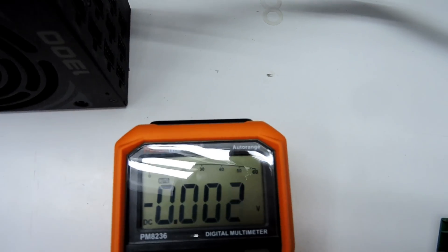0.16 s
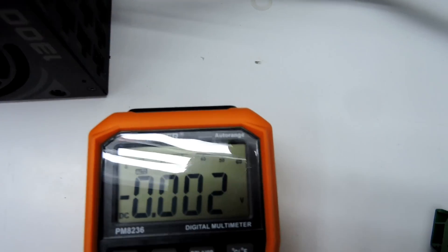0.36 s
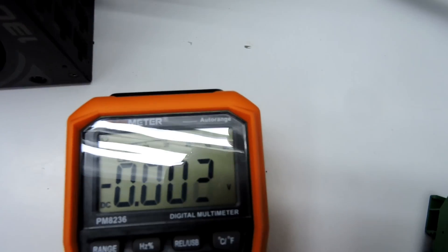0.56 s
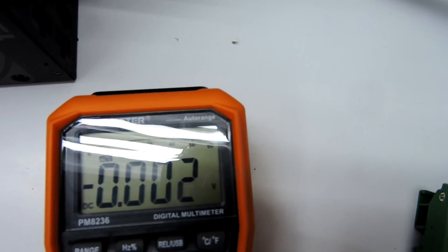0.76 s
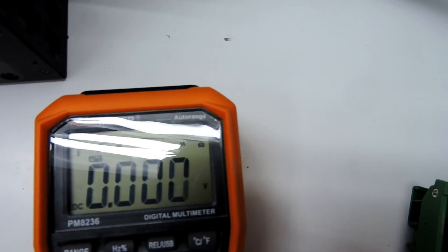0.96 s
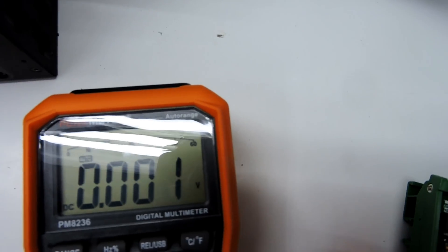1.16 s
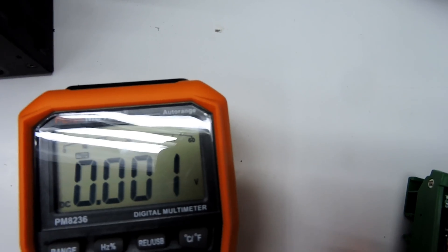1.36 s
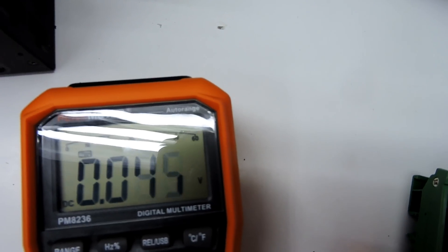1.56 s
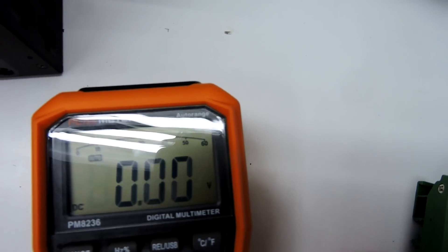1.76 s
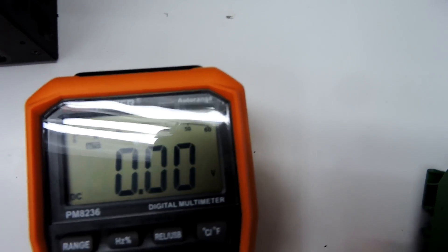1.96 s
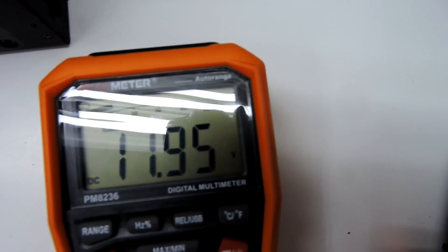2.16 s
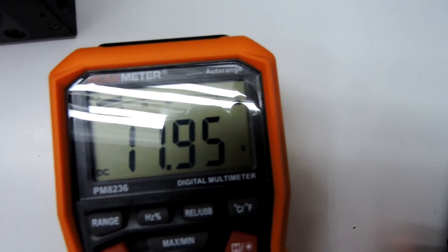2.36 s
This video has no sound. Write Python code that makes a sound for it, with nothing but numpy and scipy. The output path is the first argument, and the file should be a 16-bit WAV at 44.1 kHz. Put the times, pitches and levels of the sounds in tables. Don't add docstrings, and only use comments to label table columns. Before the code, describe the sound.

Continuous fan noise, low wavering motor hum with rushing air and thin high sizzle, close and quiet in stereo at a workbench; soft knocks on the camera body and two small probe ticks interrupt briefly.

```python
import sys
import numpy as np
from scipy import signal
from scipy.io import wavfile
from scipy.ndimage import uniform_filter1d, map_coordinates

SR = 44100
rng = np.random.default_rng(int(sys.argv[2]) if len(sys.argv) > 2 else 0)


def gain_from_db(level_db):
    decades = np.asarray(level_db, float) / 20
    return 10 ** decades


def waveform_to_disk(signal):
    frames = np.transpose(np.atleast_2d(signal))
    scaled = np.clip(frames, -1, 1) * 32767
    samples = np.round(scaled).astype(np.int16)
    wavfile.write(sys.argv[1], SR, samples)


N = 110161
AIR_DB = -46.5


def level(x, db):
    return x * gain_from_db(db) / np.sqrt(np.mean(x ** 2))


def read(table, hz):
    table = np.array(table)
    return np.interp(np.log(hz), np.log(table[:, 0]), table[:, 1])


def band(x, hz, width_hz):
    edges = [hz - width_hz / 2, min(hz + width_hz / 2, 0.49 * SR)]
    return signal.sosfilt(signal.butter(2, edges, "band", fs=SR, output="sos"), x)


def walk(rate_hz):
    hold = int(SR / rate_hz)
    steps = np.repeat(rng.standard_normal(N // 400), hold)[:N + hold]
    slewed = uniform_filter1d(uniform_filter1d(steps, hold), hold)
    return 1.3 * slewed[:N]


def pan(left_minus_right_db):
    return gain_from_db(np.array([[left_minus_right_db], [-left_minus_right_db]]) / 2)


def partly_alike(a, b, likeness):
    return np.array([a, likeness * a + np.sqrt(1 - likeness ** 2) * b])


def delayed(x, lag_s):
    return map_coordinates(x, [np.arange(N) - lag_s * SR], mode="mirror")


def rush(spectrum, db, swell_db, flicker_db, rate_hz, focus=1):
    # pitch_hz, likeness (0-1)
    alike = [(60, 0.87), (130, 1), (290, 0.94), (640, 0.74), (1410, 1), (3100, 0), (6800, 0.44),
             (15000, .02)]
    # pitch_hz, left_minus_right_db
    lean = [(60, 6.5), (200, 1), (380, 2), (700, 8), (1290, 7), (2380, -0.8), (4400, 0.9), (15000, 2.7)]
    out = 0
    swell = walk(rate_hz / 2)
    lowest_hz, highest_hz = spectrum[0][0], spectrum[-1][0]
    for hz in lowest_hz * 2 ** np.arange(0, np.log2(highest_hz / lowest_hz), 1 / 3):
        a, b = band(rng.standard_normal((2, N)), hz, hz / 4)
        likeness = np.clip(read(alike, hz), 0, 1) ** focus
        gain = gain_from_db(read(spectrum, hz) + swell_db * swell + flicker_db * walk(rate_hz))
        out = out + gain * pan(read(lean, hz)) * partly_alike(a, b, likeness)
    return level(out, db)


def tone(hz, db, wander):
    turns = rng.random() + np.cumsum(hz * (1 + wander * walk(3.02))) / SR
    return np.sqrt(2) * gain_from_db(db) * np.sin(2 * np.pi * turns)


def motors(fan_db, buzz_db):
    # pitch_hz, level_db, waver_db
    hums = [(41.6, -39.5, 2.5), (51.1, -44.5, -8), (76, -45.5, -3), (99.9, -61.5, -8), (144.7, -51, -4),
            (170, -53, 3), (178, -54, 3), (237, -56, 3.5), (28.5, -59, -13)]
    out = tone(60.6, fan_db + 0.7, 0.0053) + tone(118.6, buzz_db - 0.4, 0.0046)
    for hz, db, waver_db in hums:
        out = out + tone(hz, db + waver_db * walk(5.26), 0.00602)
    return pan(1.6) * out


def rumble():
    # pitch_hz, level_db (per Hz)
    rumble_spectrum = [(20, -10), (32, -13.5), (50, -1.5), (80, -3), (130, -4), (250, -8.5), (330, -16.5),
                       (600, -34)]
    return rush(rumble_spectrum, -39.5, 0.29, 1.55, 5.83)


def stream():
    # pitch_hz, level_db (per Hz)
    air_spectrum = [(200, -1), (400, -1.5), (720, -5), (950, -8.5), (1500, -7), (2500, -12.5),
                    (4500, -21.5), (8000, -25)]
    return rush(air_spectrum, AIR_DB, 0.8, 1.1, 11.75)


def case():
    # pitch_hz, width_hz, level_db (against the stream)
    resonances = [(509, 49, -15), (723.6, 75, -13), (904, 34, -19.5), (1160, 45, -19), (1737, 75, -26.5)]
    out = 0
    for hz, width_hz, db in resonances:
        blown = band(rng.standard_normal(N), hz, width_hz)
        out = out + level(blown, AIR_DB + db + 3.5 * walk(4.68))
    return pan(3.7) * out


def draught(near_db):
    # pitch_hz, level_db (per Hz)
    draught_spectrum = [(350, -11.5), (700, -2.5), (1200, -8.5), (2200, -11), (4500, -20.5), (7000, -25)]
    steady_db, lead_s = -49, 0.00022
    gain = np.sqrt(np.clip(gain_from_db(near_db) ** 2 - gain_from_db(steady_db) ** 2, 0, None))
    left, right = gain * rush(draught_spectrum, 1.5, 0.57, 0.95, 11.97, focus=0.43)
    return np.array([delayed(left, lead_s), right])


def hiss(near_db):
    # pitch_hz, level_db (per Hz)
    hiss_spectrum = [(2500, -2), (5000, -7.5), (8000, -5.5), (10500, -5), (13000, -3.5), (14500, -7),
                     (16000, -10)]
    nearness = gain_from_db(0.29 * (near_db - near_db.mean()))
    return nearness * rush(hiss_spectrum, -56, 0.35, 0.6, 56)


def bearing(t):
    # pitch_hz, width_hz, level_db (loudest), left_minus_right_db
    sizzle = [(9070, 720, -63.5, 12), (8240, 260, -69.5, 15), (12100, 400, -66, -17),
              (11200, 1700, -67, 19), (13430, 300, -62, 4), (11740, 300, -67, 1), (12600, 380, -67, 6),
              (9550, 390, -68, 14), (12900, 200, -71, 2.5)]
    # facing_s, early_db (fall one second before), late_db (one second after)
    facing = [(2.22, 1.5, -1), (2.2, 23, 0), (0.34, 14, 50), (.1, 8, 40), (0.89, 30, 60), (1.5, 5, -5),
              (.42, 113, 150), (2.4, 16, 3), (.9, 32, 8)]
    grit_per_s, grit_spread_db, grit_shared = 5000, 3, 0.75
    throb_hz, throb_depth = 100, 0.25
    out = 0
    for (hz, width_hz, db, lean_db), (at, early_db, late_db) in zip(sizzle, facing):
        chance, side = rng.random((2, 2, N))
        size = gain_from_db(grit_spread_db * np.minimum(rng.exponential(size=(2, N)), 4))
        grit = (chance < grit_per_s / SR) * np.sign(side - 0.5) * size
        a, b = band(grit, hz, width_hz)
        turns = np.cumsum(throb_hz * (1 + 0.18 * walk(3.3))) / SR
        throb = 1 + throb_depth * np.sin(2 * np.pi * turns)
        aim_db = -np.where(t < at, early_db, late_db) * (t - at) ** 2 + 0.5 * walk(25.12)
        ringing = level(partly_alike(a, b, grit_shared), db)
        out = out + ringing * throb * gain_from_db(aim_db) * pan(lean_db)
    return out


def coils():
    # pitch_hz, level_db
    whines = [(7422, -80.5), (8091, -94), (12144, -73)]
    return pan(4.4) * sum(tone(hz, db + 5 * walk(4.25), 0.0022) for hz, db in whines)


def ring(t, at, modes, push_s):
    age = np.clip(t - at, 0, None)
    rise = np.clip(age / push_s, 0, 1)
    fall = np.clip(age - push_s, 0, None)
    return rise * sum(gain_from_db(db - 60 * fall / t60) * np.sin(2 * np.pi * hz * age) for hz, db, t60 in modes)


def knocks(t):
    # start_s, level_db, low_ring_hz, high_ring_hz, high_ring_db
    hand_knocks = [
        (0.2083, -32.5, 420, 850, -3),
        (0.7347, -32, 413, 620, 2.5),
        (1.965, -41.5, 440, 910, 3.5),
    ]
    t60_s = 0.026
    out = 0
    for at, db, low_hz, high_hz, high_db in hand_knocks:
        noise = band(band(rng.standard_normal(N), 810, 670), 750, 840)
        thud = level(noise, -7) * (t > at) * gain_from_db(-60 * np.abs(t - at) / t60_s)
        modes = [(low_hz, -0.5, t60_s * 1.7), (high_hz, high_db, t60_s)]
        out = out + gain_from_db(db) * pan(5.5) * (thud + ring(t, at, modes, 0.00084))
    return out


def ticks(t):
    # start_s, level_db, left_minus_right_db, probe_ring_hz, thump_db
    probe_ticks = [
        (0.308, -46.5, 8.5, 7400, 4),
        (1.3009, -42, -6, 9100, 5.5),
    ]
    # pitch_hz, level_db, t60_s
    tick_modes = [(11450, -2, .012), (11530, 4, 0.015), (12100, -3, .016), (6700, -18, 0.015)]
    scrape_s = 0.0073
    out = 0
    for at, db, lean_db, probe_hz, thump_db in probe_ticks:
        burst = (t > at) * np.exp(-((t - at - scrape_s / 3) / scrape_s * 2) ** 2)
        scrape = band(rng.standard_normal((2, N)), 9500, 7500) * burst
        modes = [*tick_modes, (probe_hz, -2.5, 0.014), (1220, thump_db, 0.015)]
        out = out + gain_from_db(db) * pan(lean_db) * (ring(t, at, modes, 0.0011) + gain_from_db(-1) * scrape)
    return out


def scene():
    # (motor buzz near 118.6 Hz, likewise)
    level_course = [(0.0, -48, -37, -41.5), (0.09, -47.5, -32, -56), (0.26, -48, -72, -42.5),
                    (0.37, -47.5, -34.5, -82), (0.57, -47, -38, -52), (0.65, -46.5, -34.5, -39),
                    (0.92, -46, -34.5, -41), (0.99, -44.5, -35.5, -46.5), (1.12, -45.5, -30.5, -39),
                    (1.67, -47.5, -36, -52.5), (1.83, -48, -43.5, -38), (1.92, -48, -33, -40),
                    (2.22, -48, -54, -38), (2.27, -47.5, -46, -54), (2.31, -47.5, -30, -38.5),
                    (2.5, -48.5, -62, -49)]
    t = np.arange(N) / SR
    course_s, *heard_db = np.array(level_course).T
    near_db, fan_db, buzz_db = (np.interp(t, course_s, db) for db in heard_db)
    air = stream() + case() + draught(near_db) + hiss(near_db)
    return motors(fan_db, buzz_db) + rumble() + air + bearing(t) + coils() + knocks(t) + ticks(t)


def band_limit(x):
    return signal.sosfilt(signal.butter(12, 15720, fs=SR, output="sos"), x)


def record(dry):
    right = delayed(dry[1], 0.0001323)
    right = signal.lfilter(*signal.butter(1, 34.4, "high", fs=SR), right)
    top_cut = signal.ellip(8, 0.2, 60, 15600, fs=SR, output="sos")
    both = signal.sosfilt(top_cut, [dry[0], right])
    return band_limit(both)


dry = scene()
out = record(dry)
waveform_to_disk(out)
```